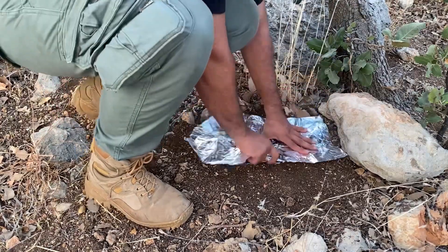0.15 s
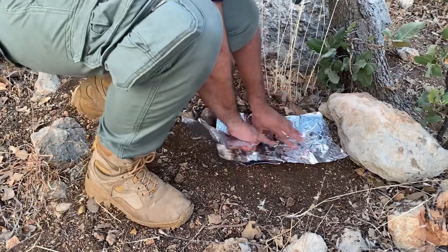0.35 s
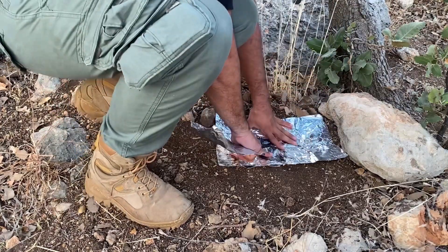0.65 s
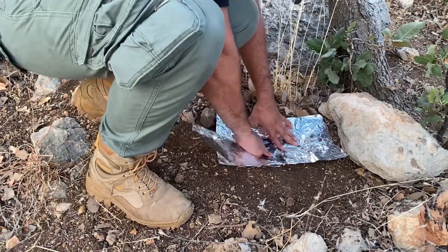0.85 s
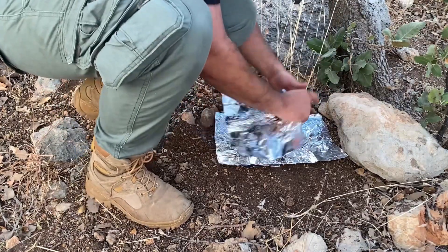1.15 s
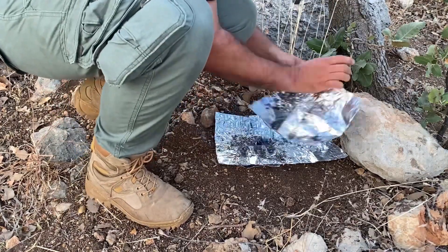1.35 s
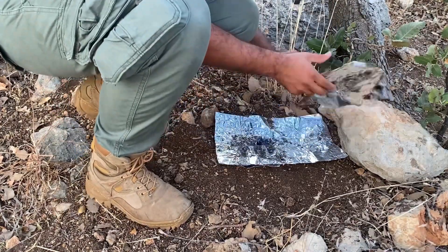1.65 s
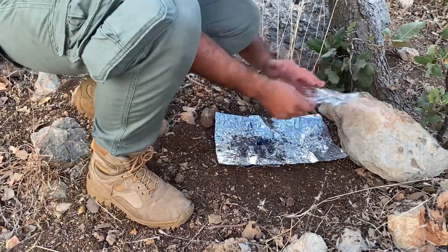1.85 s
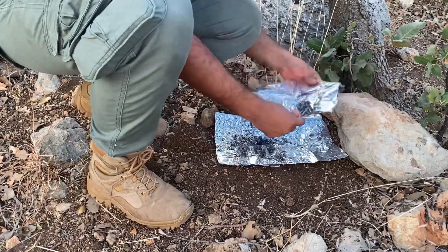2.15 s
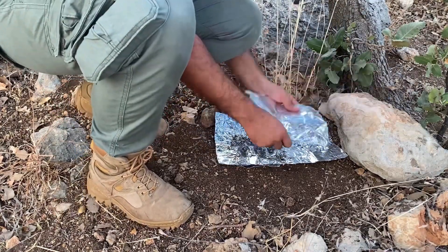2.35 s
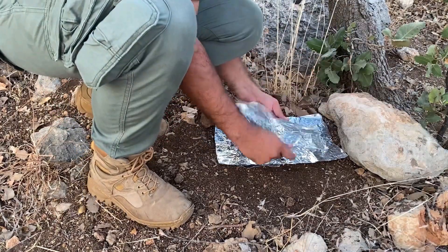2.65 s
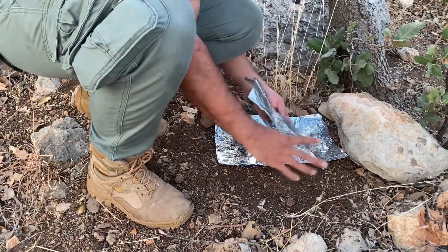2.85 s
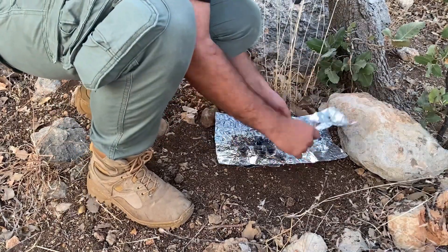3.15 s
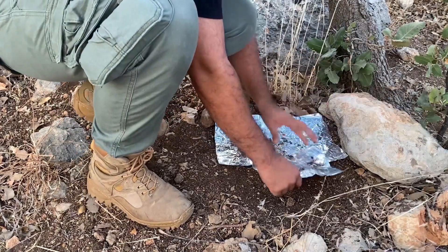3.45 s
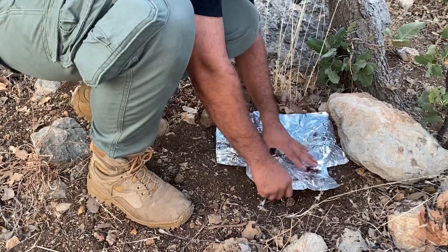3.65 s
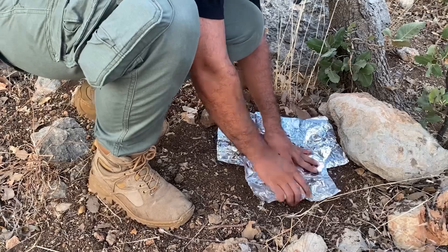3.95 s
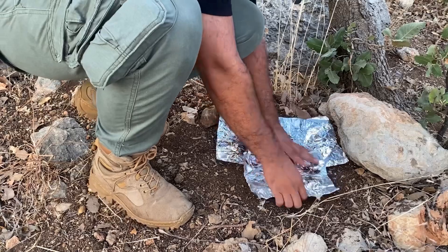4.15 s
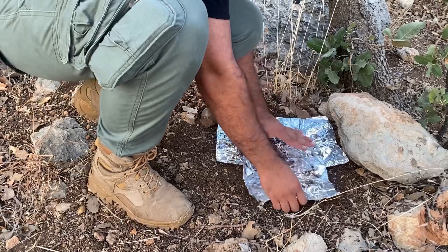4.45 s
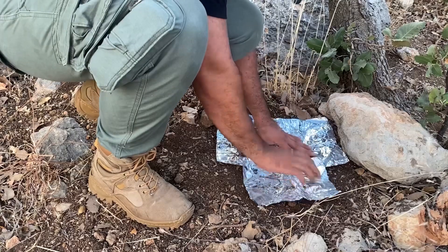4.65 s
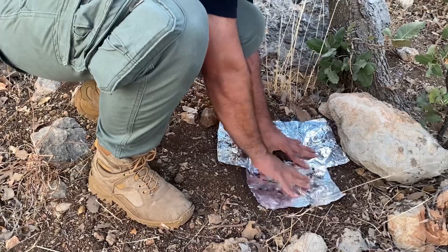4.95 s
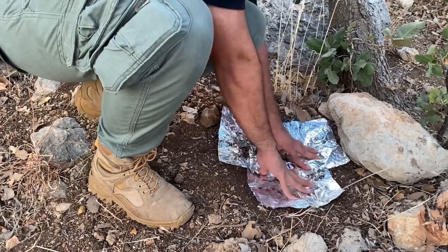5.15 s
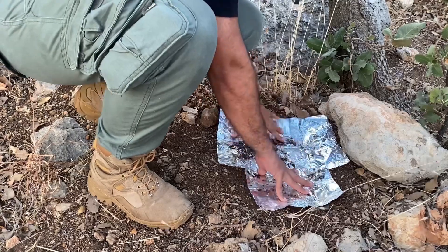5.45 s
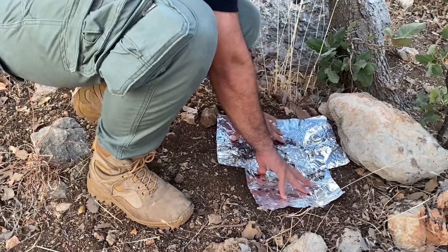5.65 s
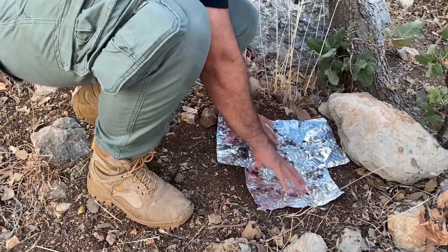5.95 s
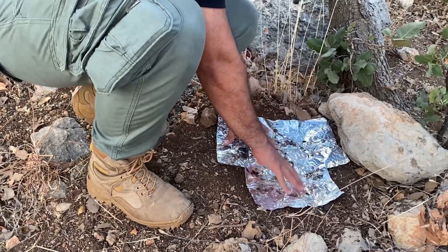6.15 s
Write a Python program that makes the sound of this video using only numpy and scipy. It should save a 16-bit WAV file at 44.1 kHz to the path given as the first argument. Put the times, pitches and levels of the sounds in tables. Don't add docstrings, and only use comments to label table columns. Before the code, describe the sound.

Outdoors, very close in stereo, hands flatten a sheet of aluminium foil. Dense sharp crackles come first, then sparse crinkles and small tinny rings as a piece is lifted and turned. Further snaps follow as it is laid down and pressed, with a tiny squeak past four seconds. Low wind buffeting grows strong in the second half, over faint forest air.

```python
import sys
import numpy as np
from scipy import signal
from scipy.fft import rfft, irfft, next_fast_len
from scipy.io import wavfile
from scipy.ndimage import uniform_filter1d, map_coordinates

SR = 44100
rng = np.random.default_rng(int(sys.argv[2]) if len(sys.argv) > 2 else 0)


def transcribe(u):
    v = np.clip(np.atleast_2d(u).T, -1, 1)
    q = np.round(v * 32767).astype(np.int16)
    wavfile.write(sys.argv[1], SR, q)


def voltage_ratio(level):
    return 10 ** (np.asarray(level, float) / 20)


N = 277830

# start [t/s], length [t/s], level [dB], brightness [dB]
STROKES = [(0, 0.037, -48, -8), (.112, 0.014, -51, -8), (.135, 0.052, -49.5, -1.5),
           (.172, 0.057, -45, -4.5), (.262, 0.01, -46.5, -3), (.34, 0.017, -53.5, -7.5),
           (.393, 0.01, -50.5, -5), (.416, 0.019, -47.5, -14), (.45, 0.044, -55.5, -3),
           (.543, .005, -51, -8), (.56, 0.032, -47, -10.5), (.61, 0.062, -60.5, 2.5),
           (1.258, 0.014, -53, -1.5), (1.305, 0.042, -56, -20), (1.852, 0.018, -62.5, 3.5),
           (1.9, 0.019, -60.5, -49), (1.76, 0.019, -61.5, -3.5), (1.936, 0.043, -53.5, 1.5),
           (1.99, 0.058, -60.5, 0), (2.43, 0.11, -63.5, -14.5), (2.665, 0.027, -50.5, -7),
           (2.715, 0.021, -55, -7), (2.895, 0.12, -68, -2.5), (3.0, 0.084, -60, -4.5),
           (3.392, 0.0056, -52, -14), (3.47, 0.067, -53, -9), (3.705, 0.022, -48.5, -7),
           (4.075, 0.018, -55, -3), (4.098, 0.0042, -51.5, 15.5), (4.15, 0.044, -63, -1),
           (4.205, 0.059, -52, -0.5), (4.385, 0.053, -53, 9.5), (4.435, 0.014, -43.5, 7),
           (4.675, 0.043, -57, -4), (4.76, 0.088, -62, -8), (4.89, 0.18, -54.5, -6), (5.1, 0.16, -60, -5),
           (5.47, 0.048, -49.5, -7.5), (5.795, 0.12, -64.5, -4.5)]
# start [t/s], length [t/s], level [dB], brightness [dB]
SHIFTS = [
    (0.74, 0.58, -62.5, -6.5),
    (2.14, 0.47, -65.5, -3.5),
    (3.625, 0.05, -61, -5),
    (3.793, 0.39, -58, -8.5),
    (4.484, 0.2, -63, -13),
    (5.299, 0.098, -66, -3.5),
    (5.613, 0.14, -67.5, -6.5),
]
# f [Hz], density [dB per Hz]
BODY_SPECTRUM = [(150, -52), (500, 5.5), (1000, 4), (2000, 2.5), (4000, 2), (6000, -10.5)]
# f [Hz], density [dB per Hz]
SHEEN_SPECTRUM = [(4000, 3), (6500, 3.5), (8500, 8.5), (11000, 0.5), (13000, -0.5), (15000, -35),
                  (16300, -28)]

# t [s], peak level [dB], f [Hz]
DULL_CREASES = [(0.0926, -30, 2180), (0.4772, -28.5, 2200), (0.5482, -32, 1170), (0.6207, -27, 4400),
                (0.896, -40, 1410), (0.9265, -41, 1080), (0.989, -31.5, 1440), (1.04, -43, 2340),
                (2.2615, -27.5, 1470), (2.274, -25.5, 1920), (2.3152, -22.5, 2300), (0.814, -41.5, 850),
                (2.537, -41, 650), (2.556, -47, 2500), (2.565, -40, 800), (3.8842, -35, 960),
                (3.924, -36.5, 1500), (4.7123, -34.5, 940), (4.882, -30, 1560), (5.0392, -32, 1980),
                (5.042, -22.5, 2240), (5.091, -27, 2550), (5.427, -30.5, 2680)]
# t [s], peak level [dB], f [Hz]
PLAIN_CREASES = [(.0014, -26.5, 3370), (0.038, -26, 1050), (0.1013, -30.5, 910), (.408, -29.5, 3520),
                 (0.56, -29.5, 1610), (0.583, -32.5, 1120), (0.634, -38.5, 1450), (1.1372, -39, 1350),
                 (1.205, -40, 1280), (1.8948, -38, 2150), (2.95, -40, 2930), (3.4363, -36.5, 1120),
                 (3.9954, -35.5, 1740), (4.6752, -36.5, 970), (4.9403, -37, 902), (5.1634, -36, 2170),
                 (5.19, -32.5, 966), (5.4731, -32, 1800)]
# t [s], peak level [dB], f [Hz]
BRIGHT_CREASES = [(0.0307, -27, 1090), (0.6583, -27, 8300), (3.0901, -36.5, 2100), (4.1675, -40, 1620),
                  (4.2024, -35, 3650), (5.1277, -19, 3400), (5.2684, -34, 2090), (5.8002, -39.5, 3091)]
# t [s], peak level [dB], f [Hz]
TICKS = [(0.392, -44, 1940), (0.4448, -30, 1410), (0.451, -25, 4900), (.492, -48, 6000), (0.57, -34, 1800),
         (.592, -43, 704), (.603, -37, 800), (0.203, -29, 2000), (.242, -38, 4800), (1.909, -40.5, 1710),
         (5.483, -30.5, 2700), (5.493, -30, 1500), (5.505, -43, 2000), (1.247, -38, 2000),
         (1.08, -45, 4000), (2.004, -30, 2900), (2.3616, -53, 2400), (2.8965, -49, 3840),
         (3.0673, -54, 2050), (4.585, -48, 2000), (4.968, -45, 1130), (5.0208, -34.5, 1990),
         (5.036, -25, 1960), (5.061, -33, 3970), (5.223, -34.5, 4840), (5.37, -55, 3500),
         (5.572, -54, 3700), (5.67, -49, 2200), (4.098, -25, 4660), (4.11, -34, 3300)]
# brightness [dB], t60 [s]
CREASE_KINDS = [
    (-53, 0.042),
    (-15.5, 0.054),
    (-3, 0.042),
    (-13.5, 0.075),
]
# t [s], peak level [dB], f [Hz], brightness [dB]
FOLDS = [(0.229, -30.5, 1670, -4), (0.4494, -35, 1070, 7), (1.322, -34.5, 1830, -5),
         (1.752, -37.5, 3830, -18), (1.9342, -30, 2900, -5.5), (1.944, -28, 3170, -5),
         (2.0, -39, 2220, -19), (2.146, -38.5, 930, -9), (3.0039, -29.5, 2090, -3),
         (3.697, -38.5, 1400, -14), (3.801, -25.5, 2270, -8), (4.099, -36, 1250, -16),
         (0.415, -29, 1460, -3), (3.381, -34.5, 2450, -3.5), (1.26, -29.5, 4970, -1),
         (5.7115, -39, 2980, -25), (3.495, -37, 3000, -6)]

# start [t/s], end [t/s], start f [Hz], end f [Hz], level [dB]
SQUEAK = [
    (4.37, 4.415, 4190, 4215, -31),
    (4.408, 4.438, 4125, 4080, -34),
]
# start [t/s], end [t/s], f [Hz],
# level [dB], pitch scatter [Hz]
DRAG = [(4.388, 4.425, 10110, -40, 60), (4.405, 4.432, 10830, -43, 120), (4.402, 4.418, 9410, -41, 100),
        (4.422, 4.452, 6843, -34, 40), (4.438, 4.472, 4630, -38, 120), (4.38, 4.415, 2450, -55, 40),
        (4.5, 4.535, 2350, -60, 90), (4.44, 4.467, 9200, -37, 120), (4.434, 4.462, 3200, -42, 170),
        (4.438, 4.46, 11010, -42, 150), (4.46, 4.502, 2355, -44, 30), (4.456, 4.496, 1850, -49, 70),
        (4.442, 4.458, 2450, -45, 80), (4.445, 4.47, 4150, -43, 120), (4.436, 4.465, 10100, -41, 100),
        (4.435, 4.46, 11400, -42, 100), (4.455, 4.48, 6700, -43, 120), (3.015, 3.108, 2040, -63, 40),
        (3.01, 3.105, 1275, -64, 25), (4.475, 4.505, 4200, -54, 80), (4.233, 4.243, 7640, -45, 60),
        (4.265, 4.281, 7640, -48, 40), (4.252, 4.276, 5750, -54, 50), (4.248, 4.277, 4900, -54, 50),
        (4.265, 4.287, 3400, -56, 60)]
# t [s], f [Hz], peak level [dB], t60 [s]
RINGS = [(2.675, 560, -50, .1), (2.675, 780, -47, .1), (2.725, 851, -51, .35), (2.68, 2100, -51, .07),
         (2.675, 2550, -52, .06), (3.0, 2650, -48, .06), (4.098, 1220, -40, .05), (3.8, 3600, -42, .05),
         (2.73, 1260, -61, .25), (2.67, 1700, -54, .1), (2.998, 1000, -50, .07), (3.0, 2000, -50, .15),
         (.136, 2600, -45, .3), (2.003, 2800, -42, .08), (1.991, 2050, -44, .1), (1.996, 5000, -46, .07),
         (1.768, 3400, -52, .09), (1.858, 2150, -55, .1), (1.752, 1800, -46, .06), (1.935, 2850, -42, .1),
         (3.497, 1130, -46, .08), (5.712, 1200, -48, .07), (5.712, 2350, -51, .09), (1.325, 900, -49, .2)]

# start [t/s], length [t/s], buffet level [dB], flutter level re buffet [dB]
GUSTS = [(0, 0.057, -59.5, -2.5), (.125, 0.015, -51, -8), (.22, 0.04, -53.5, 2.5), (.4, 0.32, -60, -3),
         (.8, 0.075, -50, -11), (.895, 0.093, -53, -16), (1.1, 0.32, -62, -2), (1.45, 0.62, -69.5, 4),
         (1.93, 0.076, -53.5, -1.5), (2.05, 0.37, -55, -16.5), (2.35, 0.11, -47, -36),
         (2.44, 0.14, -44.5, -5.5), (2.65, 0.063, -49, -10), (2.8, 0.14, -53, -19), (2.95, 0.48, -64.5, -7),
         (3.35, 0.23, -40, -20), (3.68, 0.07, -38, -23), (3.775, 0.12, -39, -4.5), (3.96, 0.048, -44, -4),
         (4.066, 0.051, -35.5, -3.5), (4.14, 0.046, -40.5, 0.5), (4.2, 0.053, -28.5, -7),
         (4.32, 0.041, -39, -7), (4.37, 0.085, -32.5, -4), (4.5, 0.03, -31.5, -1.5),
         (4.59, 0.052, -31.5, -3.5), (4.69, 0.054, -32.5, -0.5), (4.81, 0.069, -35.5, -1.5),
         (4.92, 0.063, -38, 0.5), (5.02, 0.034, -43, -23), (5.075, 0.07, -34, -2), (5.19, 0.047, -36, 3),
         (5.29, 0.014, -39.5, 1.5), (5.36, 0.052, -37, -4.5), (5.43, 0.077, -38, -2),
         (5.6, 0.057, -38, -6.5), (5.7, 0.076, -40, -9.5), (5.81, 0.073, -42.5, -1),
         (5.925, 0.017, -37.5, -9.5), (6.0, 0.052, -45.5, -1.5), (6.13, 0.29, -42, -18)]
# f [Hz], density [dB per Hz]
BUFFET_SPECTRUM = [(12, -30), (20, -18), (42, 0.5), (64, 6), (260, -16.5), (340, -85), (570, -120)]
# f [Hz], density [dB per Hz]
FLUTTER_SPECTRUM = [(90, -20.5), (180, -1.5), (280, -2.5), (400, -9.5), (600, -23), (900, -46),
                    (1600, -120)]
# f [Hz], density [dB per Hz]
SPRAY_SPECTRUM = [(200, -22), (400, -9), (550, -2), (750, -8.5), (1000, -18), (1400, -29.5), (2500, -120)]
# t [s], peak level [dB], f [Hz]
POPS = [(3.779, -29, 276), (3.806, -24, 345), (3.854, -29, 272), (3.879, -35, 258), (4.074, -21.5, 302),
        (4.089, -33, 342), (4.12, -21, 358), (4.14, -25, 287), (4.223, -25.5, 335), (4.243, -27, 413),
        (4.26, -26, 245), (4.28, -25.5, 396), (4.361, -27.5, 322), (4.373, -31.5, 405), (4.413, -21.5, 397),
        (4.436, -18.5, 397), (4.457, -17, 313), (4.503, -21, 335), (4.526, -30, 370), (4.545, -24.5, 470),
        (4.577, -32, 311), (4.599, -24.5, 363), (4.619, -26.5, 530), (4.644, -30, 560), (4.65, -24.5, 313),
        (4.675, -34, 397), (4.694, -25, 464), (4.716, -22.5, 460), (4.734, -28, 480), (4.765, -31, 380),
        (4.78, -28, 366), (4.818, -35, 323), (4.843, -29.5, 361), (4.874, -26.5, 384), (4.889, -31, 354),
        (4.921, -26.5, 266), (4.936, -28.5, 455), (4.948, -26, 404), (4.96, -28.5, 322), (4.981, -27, 293),
        (5.075, -30.5, 279), (5.101, -30, 394), (5.121, -24.5, 383), (5.152, -29, 322), (5.2, -20, 483),
        (5.226, -22, 415), (5.251, -29.5, 406), (5.307, -32, 290), (5.399, -34, 320), (5.442, -22.5, 483),
        (5.449, -25.5, 380), (5.595, -32.5, 465), (5.61, -31, 430), (5.625, -39, 510), (5.829, -32, 390),
        (5.885, -39, 338), (5.937, -33, 338), (6.038, -31, 322)]
# t [s], peak level [dB], f [Hz]
ROLLS = [(0.135, -34.5, 91.5), (0.904, -31.5, 81), (2.521, -30.5, 92.5), (2.557, -29, 82),
         (3.577, -30.5, 88), (3.819, -29, 100), (3.851, -33, 108), (4.078, -22, 94), (4.118, -25, 107),
         (4.144, -22, 114), (4.206, -22.5, 94.5), (4.248, -34, 94), (4.375, -21, 110), (4.434, -23, 98),
         (4.459, -19, 107), (4.505, -27, 83), (4.54, -21, 91), (4.647, -20.5, 93), (4.674, -34, 80),
         (4.702, -25, 120), (4.744, -35, 103), (4.779, -25, 99), (4.817, -23.5, 98), (4.879, -25, 106),
         (4.923, -25, 99), (4.953, -24.5, 90), (5.01, -32, 103), (5.118, -24.5, 96), (5.147, -29, 93),
         (5.171, -27, 89), (5.214, -22.5, 121), (5.245, -27, 92), (5.318, -25.5, 123), (5.377, -21, 102),
         (5.406, -25.5, 102), (5.434, -30, 92), (5.458, -21, 112), (5.488, -27, 111), (5.525, -27.5, 94),
         (5.611, -25, 89), (5.877, -23.5, 103)]
# t [s], peak level [dB]
THUMPS = [(3.312, -34), (3.383, -42), (3.481, -42), (3.956, -26), (3.985, -28), (4.062, -18), (4.335, -26),
          (5.709, -36), (5.817, -33), (5.859, -20.5), (6.069, -25), (2.495, -38), (2.535, -36),
          (2.615, -28.5), (2.95, -34.5), (1.912, -34)]
# lowest f [Hz], highest f [Hz]
THUMP_HZ = (178, 310)

# f [Hz], density [dB per Hz]
AIR_SPECTRUM = [(40, 34), (150, 3), (500, 6), (2000, -4), (6000, -7.5), (9000, -5), (13000, -13.5),
                (16300, -52)]
# f [Hz], left-right correlation [1]
ALIKE = [(60, .87), (300, .86), (700, .83), (1500, .92), (3500, .82), (6000, .62), (7500, .65), (8200, .96),
         (9500, .85), (12000, .93)]
# f [Hz], phase [rad]
LEAD = [(0, 0), (1900, 0), (3500, .7), (5000, .5), (6000, -.4), (7200, -.6), (8200, -2.6), (8800, -3.4),
        (10300, -6.2), (11500, -6.3), (12700, -9.4), (14300, -9.5), (15100, -12.5), (16500, -12.6)]


def rustle():
    handling_db, bright_db = swells(STROKES + SHIFTS, rise_db_s=778, fall_db_s=282,
                                    rest_db=-78.5, rest_colour_db=-3.5)
    buckles = crackle(rate=420, spread_db=3.5, t60_s=0.029)
    facets = pings(rate=260, middle_hz=2400, octaves=.8, cycles=11, spread_db=2.8)
    body = patchy(coloured(BODY_SPECTRUM, .5 + .65 * buckles), depth_db=3.5) + .55 * facets
    sheen = patchy(coloured(SHEEN_SPECTRUM, .75 + .9 * buckles), depth_db=2.5)
    unsteady_db = 1.2 * wobble(30)
    return voltage_ratio(handling_db + unsteady_db) * (body + voltage_ratio(bright_db + 4.5) * sheen)


def snaps():
    crease_rise_s, fold_rise_s, fold_t60_s = .0001, .001, .06
    events = []
    for rows, kind in zip((DULL_CREASES, PLAIN_CREASES, BRIGHT_CREASES, TICKS), CREASE_KINDS):
        events += [(*row, *kind, crease_rise_s) for row in rows]
    events += [(*row, fold_t60_s, fold_rise_s) for row in FOLDS]
    out = np.zeros((2, N + SR))
    for s, db, hz, bright_db, t60_s, rise_s in events:
        burst = release(t60_s, rise_s, spike=6 * crease_rise_s / rise_s)
        snap = filtered(burst, crease_response(hz, bright_db))
        out[:, round(s * SR):][:, :snap.shape[1]] += voltage_ratio(db) * snap / np.abs(snap[0]).max()
    return out[:, :N]


def release(t60_s, rise_s, spike):
    t = np.arange(SR // 10) / SR
    main = voltage_ratio(-60 * t / np.clip(t60_s, .006, .07))
    quick = 0.34 * voltage_ratio(-60 * t / (0.27 * t60_s))
    click = 4.96 * voltage_ratio(-60 * t / 0.0027)
    burst = (main + quick + click) * rng.standard_normal((2, len(t)))
    burst *= 1 - np.exp(-(t + 1 / SR) / rise_s)
    burst[0, :2] += spike
    return burst


def crease_response(hz, bright_db):
    dull_above_hz = 6400
    others_hz = np.sqrt(1500 * hz) * 2 ** rng.uniform(-0.45, 1.607, size=5)

    def response(f):
        own = 1.6 * resonance(f, hz, .2 * hz)
        others = 1.2 * sum(resonance(f, c, .1 * c) for c in others_hz)
        body = (own + others + 1.1) * resonance(f, 1070, 6000) / (1 + 1j * f / dull_above_hz) ** 2
        return body + voltage_ratio(bright_db + 12.5) * resonance(f, 7600, 5160) ** 2

    return response


def squeaks():
    octave_db, clear_scatter_hz = -6, 22
    slips = []
    for start, end, from_hz, to_hz, db in SQUEAK:
        for k in (1, 2):
            slips.append((start, end, k * from_hz, k * to_hz, db + (k - 1) * octave_db,
                          k * k * clear_scatter_hz))
    slips += [(start, end, hz, hz, db, scatter_hz) for start, end, hz, db, scatter_hz in DRAG]
    out = np.zeros(N)
    for start, end, from_hz, to_hz, db, scatter_hz in slips:
        u = np.linspace(0, 1, round((end - start) * SR))
        stutter = voltage_ratio(scatter_hz / 40 * wobble(466, count=len(u)))
        grip = stutter * np.sin(np.pi * u ** 1.33) ** 0.37
        hz = from_hz + (to_hz - from_hz) * u + scatter_hz * wobble(510, count=len(u))
        tone = np.sin(2 * np.pi * np.cumsum(hz) / SR)
        out[round(start * SR):][:len(u)] += voltage_ratio(db + 2.5) * unit(grip) * tone
    return out


def rings():
    out, age = np.zeros(N), np.arange(SR // 2) / SR
    for s, hz, db, t60_s in RINGS:
        shimmer = voltage_ratio(3.2 * wobble(120, count=len(age)))
        decay = voltage_ratio(db - 60 * age / t60_s) * (1 - np.exp(-age / 0.00024))
        phase = 2 * np.pi * hz * age + .5 * wobble(124, count=len(age))
        out[round(s * SR):][:len(age)] += decay * shimmer * np.sin(phase)
    return out


def wind():
    buffet_db, flutter_db = swells(GUSTS, rise_db_s=463, fall_db_s=240, rest_db=-74, rest_colour_db=-29)
    eddy, gust = np.tanh(wobble(17)), np.tanh(wobble(45))
    low = even(coloured(BUFFET_SPECTRUM), span_s=.03)
    low = low * voltage_ratio(2.5 * eddy + 2.5 * np.tanh(wobble(35)))
    fast = coloured(FLUTTER_SPECTRUM, voltage_ratio(0.9 * eddy + 2.8 * gust + 6.7 * np.tanh(wobble(130))))
    small = coloured(SPRAY_SPECTRUM, voltage_ratio(2 * eddy + 4 * gust + 8 * np.tanh(wobble(110))))
    small = small + 2.9 * small[0] * [[0], [1]]
    small = voltage_ratio(2.25 * flutter_db - 12) * small
    pops = whorls(POPS, cycles=0.91, boost_db=-1.13, late_s=.002, left=0.57, apart=1.0)
    rolls = whorls(ROLLS, cycles=0.52, boost_db=-0.5, late_s=0.00795, left=.05, apart=0.66)
    thumps = eddies(THUMPS, THUMP_HZ, boost_db=3.5) * [[1], [.35]]
    steady = voltage_ratio(buffet_db + 2.43) * (low + voltage_ratio(flutter_db - 3.0) * fast + small)
    return steady + pops + rolls + thumps


def whorls(events, cycles, boost_db, late_s, left, apart):
    half = SR // 20
    out, t = np.zeros(N + SR, complex), np.arange(-SR // 20, half) / SR
    for (s, db, hz), phase in zip(events, rng.uniform(0, 2 * np.pi, len(events))):
        turning = 2 * np.pi * hz * t * (1 - 0.22 * hz * t) + phase
        swing = np.exp(-(t * hz / cycles) ** 2 + 1j * turning)
        out[round((s + late_s) * SR) - half:][:len(t)] += voltage_ratio(db + boost_db) * swing
    return np.array([out.imag, left * out.imag + apart * out.real])[:, :N]


def eddies(events, range_hz, boost_db):
    out, t = np.zeros(N + SR), np.arange(SR // 20) / SR
    for (s, db), hz in zip(events, rng.uniform(*range_hz, len(events))):
        envelope = (1 - np.exp(-t / 0.0034)) * np.exp(-hz * t * 2.2)
        out[round(s * SR):][:len(t)] += voltage_ratio(db + boost_db) * envelope * np.sin(2.6 * np.pi * hz * t)
    return out[:N]


def hush():
    return voltage_ratio(-61.5) * coloured(AIR_SPECTRUM)


def ports(pair):
    def turn(hz):
        return np.arccos(np.clip(along(ALIKE, hz), -1, 1)) / 2

    def lead(hz):
        return np.interp(hz, *np.transpose(LEAD)) / 2

    mid, side = filtered(pair, lambda hz: np.array([np.cos(turn(hz)), np.sin(turn(hz))]))
    left_right = np.array([mid + side, mid - side])
    return filtered(left_right, lambda hz: np.exp(1j * np.outer([1, -1], lead(hz))))


def crackle(rate, spread_db, t60_s):
    chance, size = rng.random(N), rng.exponential(size=N)
    starts = (chance < rate / SR) * voltage_ratio(spread_db * np.minimum(size, 4))
    return unit(signal.lfilter([1], [1, -voltage_ratio(-60 / (t60_s * SR))], starts))


def pings(rate, middle_hz, octaves, cycles, spread_db):
    count, t = int(rate * N / SR), np.arange(400) / SR
    out = np.zeros((2, N + len(t)))
    for row in out:
        when, size = rng.random(count), rng.exponential(size=count)
        draw = rng.standard_normal(count)
        hz = np.clip(middle_hz * 2 ** (octaves * draw), 500, 12000)[:, None]
        level = voltage_ratio(spread_db * np.minimum(size, 4))[:, None]
        ring = level * np.exp(-t * hz / cycles) * np.sin(2 * np.pi * hz * t)
        index = (when * N).astype(int)[:, None] + np.arange(len(t))
        row += np.bincount(index.ravel(), ring.ravel(), len(row))
    return unit(out[:, :N])


def patchy(pair, depth_db):
    z = signal.stft(pair, nperseg=256)[2]
    field = uniform_filter1d(rng.standard_normal(z.shape[1:]), size=3, axis=0)
    field = uniform_filter1d(field, size=7, axis=1)
    return unit(signal.istft(z * voltage_ratio(depth_db * unit(field)), nperseg=256)[1][:, :N])


def swells(rows, rise_db_s, fall_db_s, rest_db, rest_colour_db):
    t = np.arange(0, N, 32) / SR
    start, length, db, colour_db = np.transpose(rows)[:, :, None]
    rise_db = rise_db_s * np.maximum(start - t, 0)
    fall_db = fall_db_s * np.maximum(t - start - length, 0)
    power, rest = voltage_ratio(2 * (db - rise_db - fall_db)), voltage_ratio(2 * rest_db)
    total = power.sum(axis=0) + rest
    colour = ((power * colour_db).sum(axis=0) + rest * rest_colour_db) / total
    return [np.interp(np.arange(N) / SR, t, c) for c in (10 * np.log10(total), colour)]


def coloured(spectrum, envelope=1):
    noise = envelope * rng.standard_normal((2, N))
    return unit(filtered(noise, lambda hz: voltage_ratio(along(spectrum, hz)) * (hz > spectrum[0][0]) * (hz < 16400)))


def even(pair, span_s):
    power = uniform_filter1d(pair[0] ** 2, size=int(span_s * SR))
    return unit(pair / np.sqrt(np.abs(power) + 0.14))


def resonance(f, hz, width_hz):
    return 1j * f * width_hz / (hz * hz - f * f + 1j * f * width_hz)


def wobble(rate, count=N):
    knots = rng.standard_normal(int(count * rate / SR) + 4)
    return map_coordinates(knots, [np.arange(count) * rate / SR])


def filtered(x, response):
    m = next_fast_len(x.shape[-1] + 8192)
    return irfft(rfft(x, m) * response(np.fft.rfftfreq(m, 1 / SR)), m)[..., :x.shape[-1]]


def along(points, hz):
    f, v = np.transpose(points)
    return np.interp(np.log(hz + 1), np.log(f + 1), v)


def unit(x):
    return x / np.sqrt(np.mean(x ** 2) + 1e-20)


def scene():
    tones = (squeaks() + rings()) * [[1], [-.1]]
    return ports(rustle() + snaps() + tones + wind() + hush())


def roll_off(x):
    return signal.sosfilt(signal.butter(12, 17010, fs=SR, output="sos"), x)


def record(dry):
    mix = filtered(dry, lambda hz: (hz < 16000) * (1j * hz / (38 + 1j * hz)) ** 2)
    return roll_off(mix)


dry = scene()
out = record(dry)
transcribe(out)
```